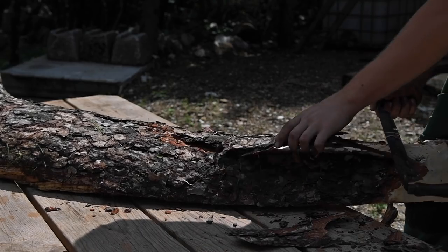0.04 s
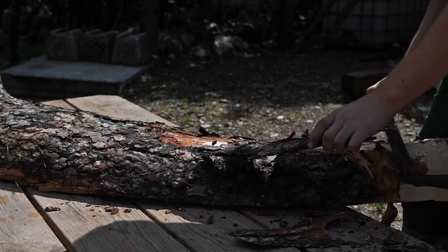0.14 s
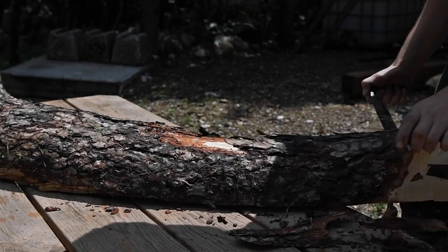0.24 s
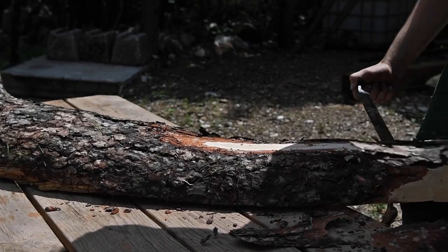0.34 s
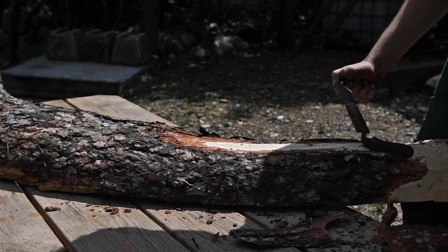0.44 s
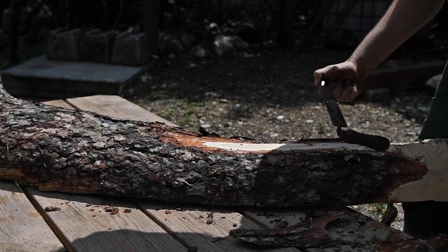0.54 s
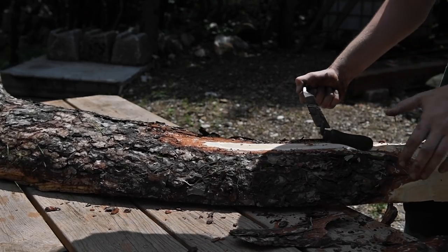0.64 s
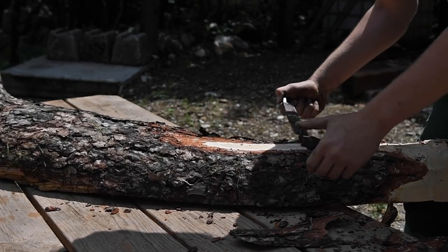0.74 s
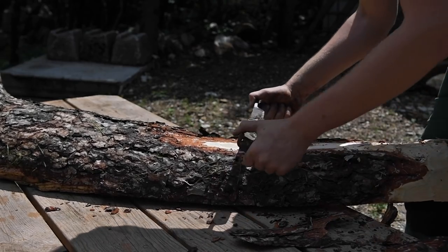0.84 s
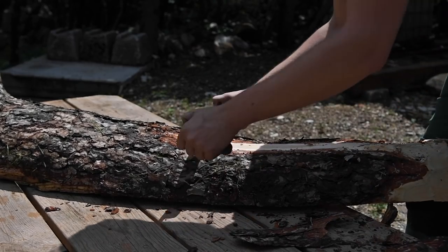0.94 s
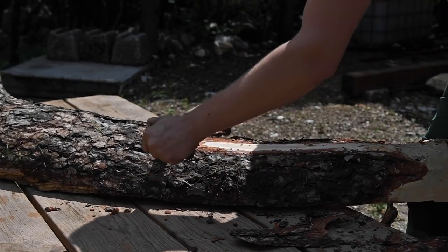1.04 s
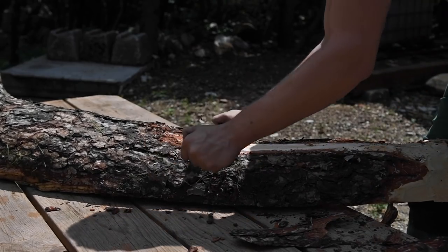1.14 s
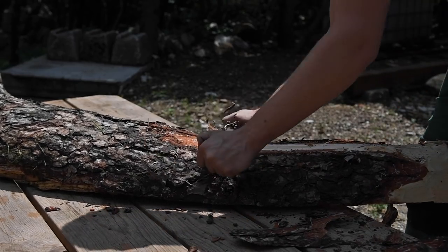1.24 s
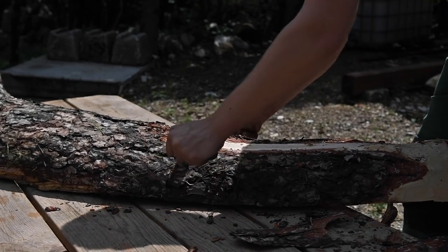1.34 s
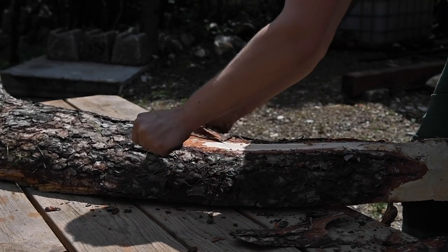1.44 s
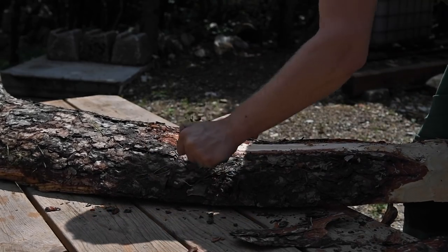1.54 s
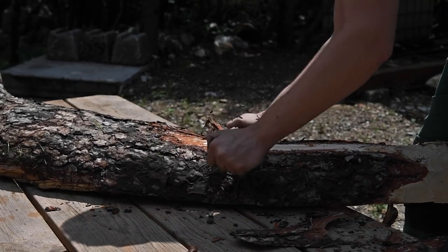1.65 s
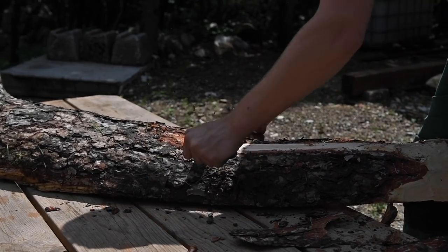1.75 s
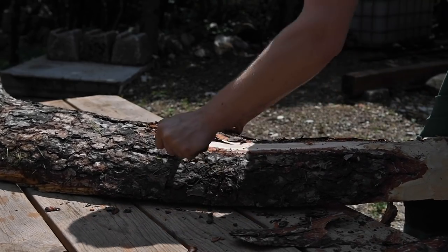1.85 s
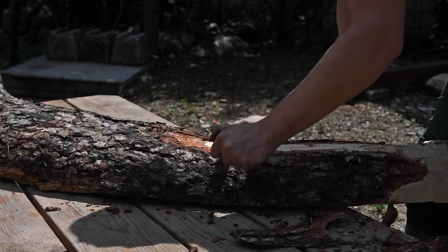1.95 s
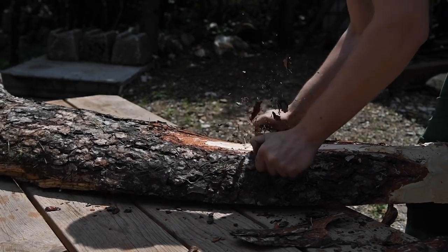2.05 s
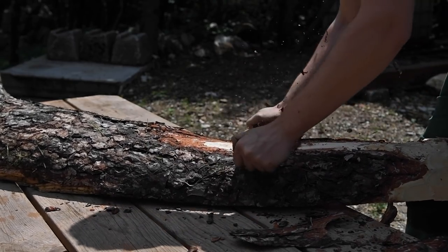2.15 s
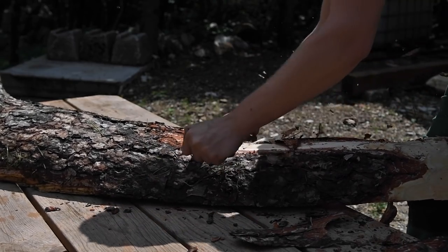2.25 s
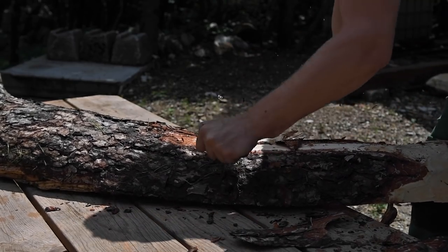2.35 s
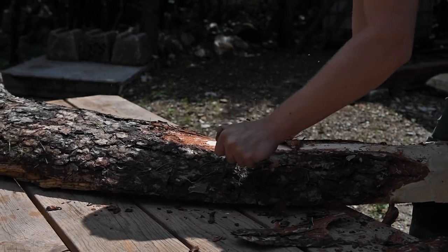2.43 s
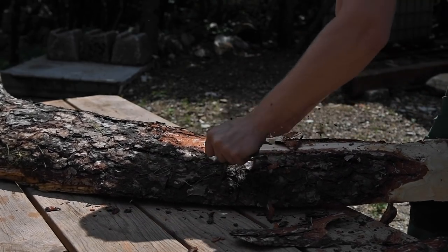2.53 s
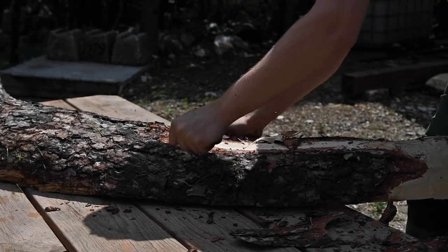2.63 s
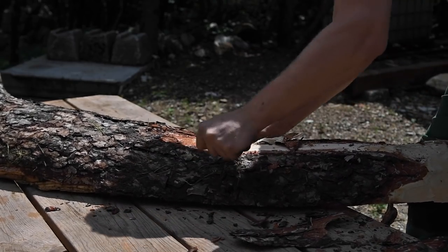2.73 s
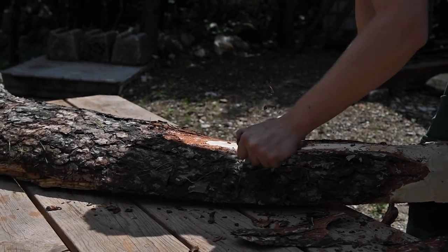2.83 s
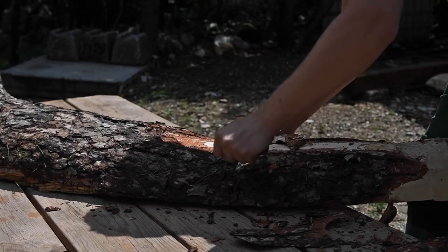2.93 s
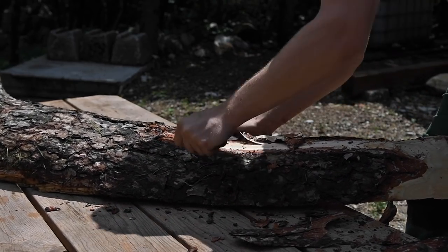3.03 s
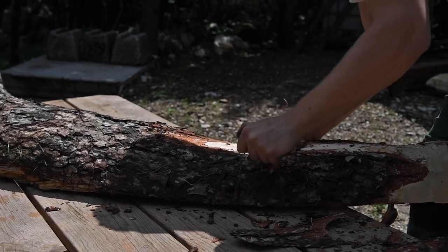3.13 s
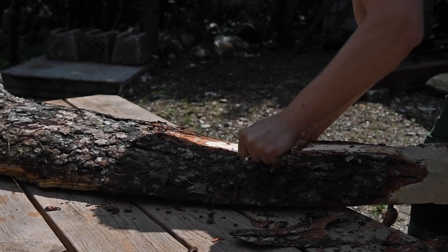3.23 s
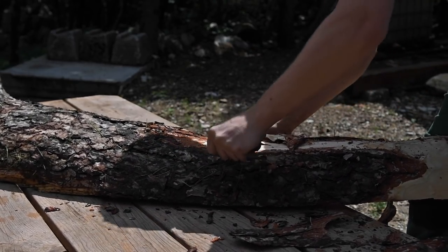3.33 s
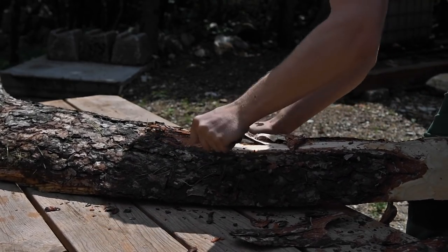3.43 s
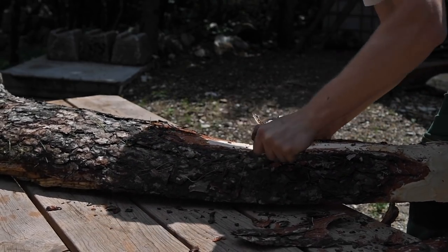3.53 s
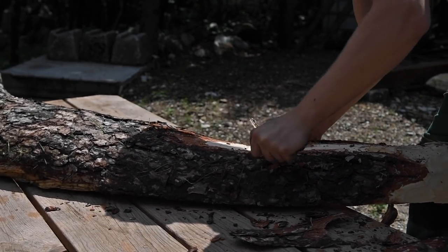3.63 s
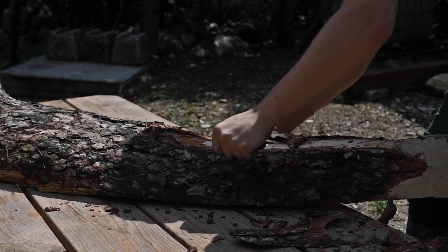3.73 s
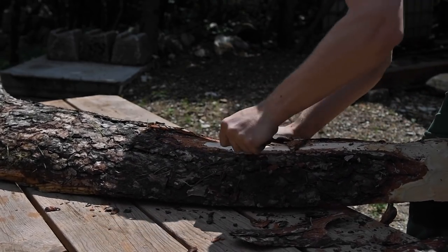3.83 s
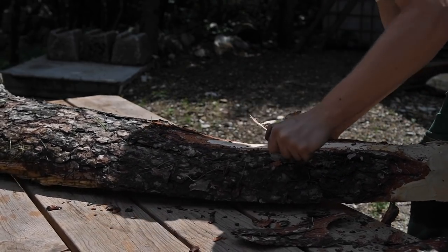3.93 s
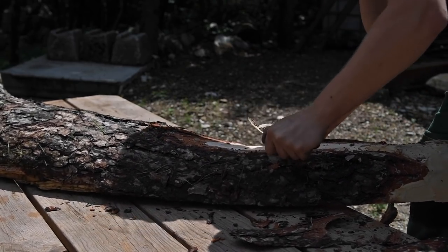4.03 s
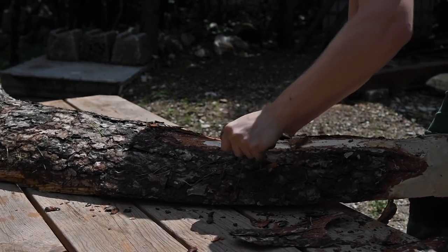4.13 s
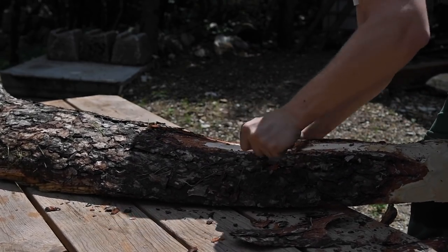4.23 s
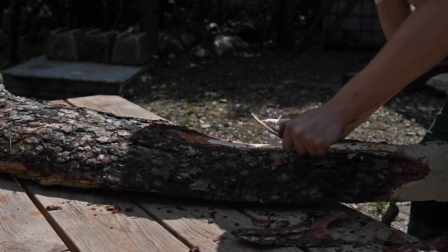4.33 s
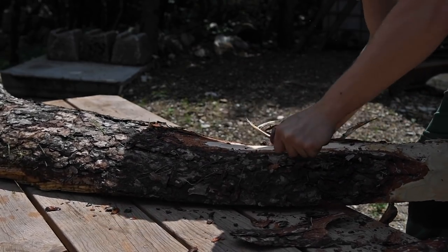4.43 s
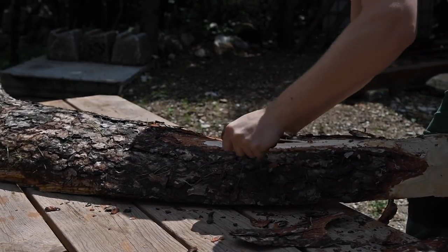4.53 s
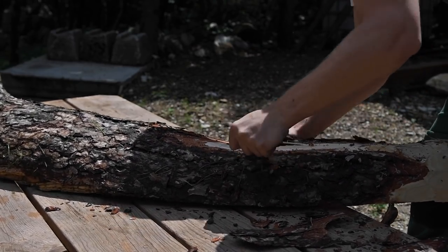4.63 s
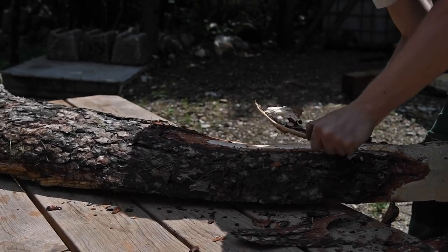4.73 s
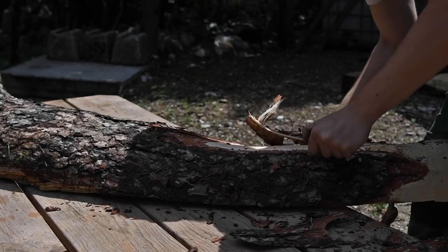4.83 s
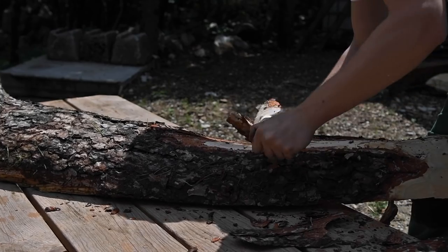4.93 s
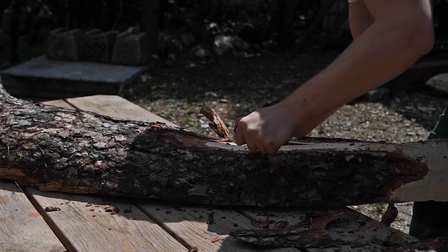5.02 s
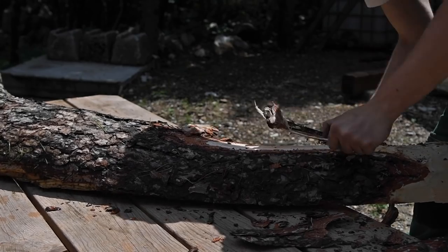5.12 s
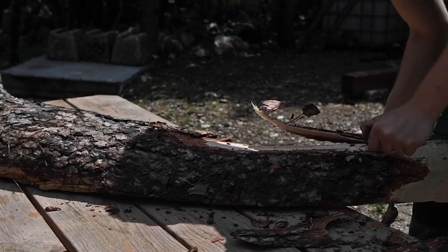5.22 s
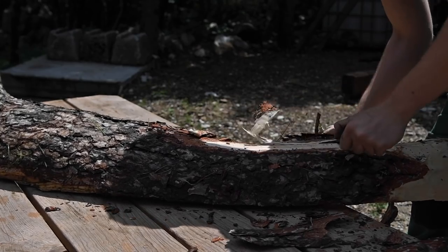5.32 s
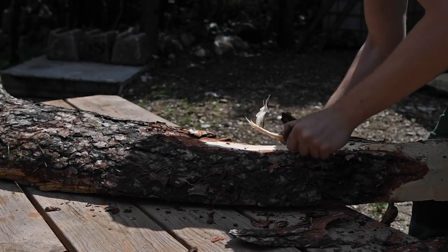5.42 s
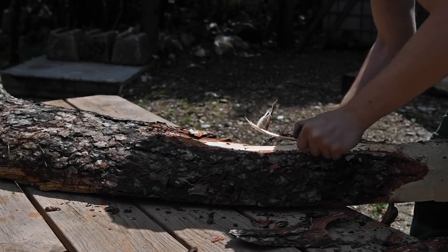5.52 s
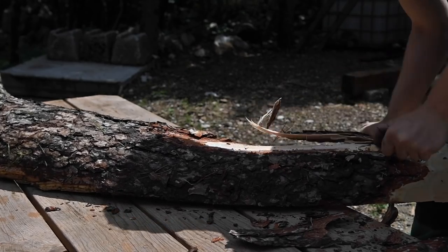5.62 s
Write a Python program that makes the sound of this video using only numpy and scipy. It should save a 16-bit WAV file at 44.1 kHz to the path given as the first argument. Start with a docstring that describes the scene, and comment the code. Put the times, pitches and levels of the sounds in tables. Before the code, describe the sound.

A close stereo microphone hears bark being stripped from a log on a plank deck outdoors. From 0 to 0.8 s there is light brushing, a small snap at 0.1 and a woody knock with scrape near 0.34; a very faint reedy tone sits around 0.55-0.97. At 0.84 a short pull knocks the wood. Rough pulls follow at about 1.2, 1.6, 2.0, 2.45, 2.8, 3.2, 3.55, 3.9, 4.35, 4.75 and 5.2 s, each a brief crackling tear with sharp bright snaps and a hollow, juddering groan from the log. The pull at 3.9 is softer and duller; those at 4.75 and 5.2 bring strong knocks. Light scrapes, rustling crumbs, ticks and soft low settling thuds fill the gaps. A distant songbird gives faint sliding whistles from 1.4, busiest at 2.2-3.3. Soft leaves, far traffic and a barely audible low hum continue throughout; light strokes end it.

```python
"""Rough pulls that crackle and snap: a drawknife strips bark from a fresh log on a plank deck outdoors. Torn
fibres are bursts of coloured noise with short ringing snaps; log and planks ring as resonances. Chips knock on
the planks, and light strokes and loose crumbs rustle in between. A brief reedy tone rings out after an early
knock. Behind it a songbird twitters in sliding whistles, with a low hum and yard noise."""
import sys
import numpy as np
from scipy import signal
from scipy.fft import rfft, irfft, next_fast_len
from scipy.io import wavfile

SR = 44100
rng = np.random.default_rng(int(sys.argv[2]) if len(sys.argv) > 2 else 0)


def store_pcm(level_fs):
    """Save levels as 16-bit WAV."""
    pcm = np.round(np.clip(level_fs, -1, 1) * 32767).astype(np.int16)
    wavfile.write(sys.argv[1], SR, np.atleast_2d(pcm).T)


N = 250047

# Pulls of the blade: (time of full force [s], rise [s], hold [s], fall [s], force [dB],
# thin fibres over thick [dB], centre of the log's groan [Hz], rocking back [dB])
PULLS = [(0.843, 0.011, 0.0032, 0.047, -32, -1, 730, -77), (1.22, 0.048, 0.024, 0.079, -35, 3, 613, -77),
         (1.627, 0.06, 0.027, 0.049, -32, -0.5, 650, -63.5),
         (2.021, 0.044, 0.0077, 0.093, -30.5, 2, 660, -66),
         (2.446, 0.053, 0.013, 0.036, -31, -7.5, 730, -53.5),
         (2.831, 0.021, 0.002, 0.051, -26, -0.3, 594, -51),
         (3.192, 0.019, 0.013, 0.037, -29, -0.5, 690, -52),
         (3.566, 0.028, 0.013, 0.042, -28, -2.9, 716, -54),
         (3.932, 0.015, 0.037, 0.011, -34.5, -1.5, 715, -52),
         (4.351, 0.033, 0.0054, 0.035, -30, -3, 735, -51), (4.753, 0.014, 0.026, 0.045, -28, -1, 820, -57),
         (5.183, 0.033, 0.012, 0.049, -29, 0.1, 820, -69)]
# Light strokes of hand or blade: (time of full level [s], length [s], bark level [dB], wood level [dB])
STROKES = [(0.047, 0.05, -46.5, -55.5), (0.112, 0.022, -67, -56.5), (0.161, 0.033, -56.5, -58),
           (0.338, 0.027, -49.5, -43), (1.08, 0.22, -58, -63), (1.413, 0.038, -79, -61),
           (1.799, 0.068, -56, -53.5), (1.867, 0.092, -56, -54.5), (2.122, 0.016, -52, -40.5),
           (2.311, 0.078, -57.5, -63), (2.632, 0.026, -40, -59), (3.012, 0.074, -75, -51),
           (3.316, 0.047, -49.5, -43), (3.39, 0.071, -60, -48), (3.704, 0.11, -66, -52.5),
           (3.785, 0.043, -49.5, -47), (3.994, 0.033, -45, -48), (4.063, 0.09, -89, -57.5),
           (4.157, 0.09, -78, -58), (4.205, 0.016, -53, -53.5), (4.453, 0.062, -108, -55.5),
           (4.53, 0.052, -59, -54), (4.61, 0.031, -62.5, -49), (4.718, 0.021, -48.5, -41.5),
           (4.977, 0.067, -53.5, -54), (5.129, 0.0071, -31, -42), (5.308, 0.019, -41, -62),
           (5.412, 0.085, -61.5, -59), (5.456, 0.11, -73.5, -54), (5.618, 0.21, -59.5, -58.5)]
# Knocks of blade and chips on wood: (time [s], peak level [dB], centre [Hz], contact [s],
# judder after it [dB])
KNOCKS = [(0.284, -47, 328, 0.0087, -55.5), (0.341, -26.5, 1100, 0.026, -40.5),
          (0.514, -52, 189, .02, -82.5), (0.583, -45, 960, 0.026, -49), (0.832, -22.5, 726, 0.016, -41),
          (0.849, -25, 970, 0.0131, -41.5), (0.926, -53, 573, 0.012, -76), (1.305, -27, 830, 0.019, -43),
          (1.473, -42, 594, 0.016, -58), (1.776, -39.5, 357, .02, -53), (2.021, -23, 670, 0.036, -38.5),
          (2.534, -41, 710, 0.034, -51), (2.627, -30.5, 940, 0.045, -55), (2.817, -22.5, 428, 0.028, -43),
          (3.313, -34.5, 1000, 0.044, -54), (3.564, -16.5, 980, 0.025, -38),
          (3.91, -29.5, 242, 0.064, -47.5), (4.292, -33.5, 240, .05, -47.5),
          (4.704, -31.5, 258, 0.077, -48), (4.745, -17.5, 830, 0.066, -61), (5.128, -14.5, 583, 0.066, -49),
          (5.399, -48, 400, 0.013, -48.5), (5.611, -41.5, 403, 0.027, -55)]
# Resonances of log and planks: (frequency [Hz], width [Hz], level [dB])
WOOD_MODES = [(206.8, 21, 8), (416.4, 76, -1), (554, 30.2, 1.5), (614.5, 80, -3.5), (838, 84, 2),
              (1084, 227, -3.5), (1430, 356, -5)]
GROAN_HZ = (498, 806)  # centres of the low and the high groan


def tearing():
    """Hard tears crackle fibre by fibre; light brushing and trickling crumbs only hiss."""
    # thick fibres: (frequency [Hz], relative level [dB])
    coarse = [(800, -7.5), (1400, 1.5), (3200, 3.5), (5000, -5.5), (7000, -21)]
    # thin fibres: (frequency [Hz], relative level [dB])
    fine = [(3500, -23.5), (5000, -0.5), (7500, 2.5), (10000, -5.5), (16000, -12.5)]
    tear, trickle = swells(tear_rows(), wake_db=-46.5, wake_fall=0.17)
    rustle = amp(rustle_db(np.arange(N) / SR))
    trickle = hush() * np.hypot(trickle, rustle)
    out = 0
    for force, after, spectrum in zip(tear, trickle, (coarse, fine)):
        crackle = coloured(grains(rate=900, spread_db=2.5, life=0.00099), spectrum)
        hiss = coloured(grains(rate=300, spread_db=7.0, life=0.015), spectrum)
        hard = force / (force + amp(-46.0))  # near 1 in a strong tear, near 0 in light brushing
        out = out + force * np.sqrt(hard) * crackle
        out = out + (force * np.sqrt(1 - hard) + after) * hiss
    return out


def tear_rows():
    """What pulls and strokes do to thick and thin fibres."""
    stroke_fine_db = -5  # thin fibres against thick in a light stroke
    pulls = [(*shape, db, db + fine_db) for *shape, db, fine_db, _, _ in PULLS]
    strokes = [(*stroke_shape(s, length), db, db + stroke_fine_db) for s, length, db, _ in STROKES]
    return pulls + strokes


def stroke_shape(s, length):
    """Time, rise, hold and fall of a light stroke, scaled by its length."""
    return s, 0.24 * length, 0.28 * length, 0.89 * length


def rustle_db(s):
    """Level of loose bark and crumbs, which rustle throughout."""
    # (time [s], level [dB])
    rustle = [(0.0, -56.5), (0.39, -73), (0.79, -68), (1.31, -62), (1.72, -65), (2.4, -67.5), (2.51, -59.5),
              (2.81, -51.5), (3.58, -63.5), (3.68, -53.5), (3.79, -64.5), (4.01, -59.5), (4.67, -57),
              (5.16, -70), (5.29, -60), (5.67, -65.5)]
    return np.interp(s, *np.transpose(rustle))


def hush():
    """Gain of rustle and wakes, which dips as the blade is lifted before each pull."""
    lead_s, half_width_s, depth_db = 0.085, 0.054, -11.5  # lead: dip's centre ahead of full force
    t = np.arange(N) / SR
    dips = sum(np.exp(-((t - pull[0] + lead_s) / half_width_s) ** 4) for pull in PULLS)
    return amp(depth_db * dips)


def biting():
    """The blade sticks and slips, which drives the log; the deck shakes on longer."""
    # rumble of the deck: (frequency [Hz], relative level [dB])
    deck = [(25, -86), (60, -31), (120, -1.5), (200, 0), (300, -9), (600, -33)]
    burst, wake = swells(bite_rows(), wake_db=-29.0, wake_fall=0.59)
    *judder, shake = burst
    *log_wake, sway = hush() * wake
    slips = grains(rate=400, spread_db=-0.5, life=0.0058)
    groans = [unit(filtered(slips, lambda f: wood(f) * peak(f, hz, 1.29 * hz) ** 2)) for hz in GROAN_HZ]
    rumble = coloured(grains(rate=200, spread_db=-4.5, life=0.022), deck)
    log = sum((now + after) * groan for now, after, groan in zip(judder, log_wake, groans))
    return log + (shake + amp(8.5) * sway) * rumble


def bite_rows():
    """What pulls, strokes and knocks do to log and deck, as levels of low groan, high groan and deck."""
    log_db, deck_db = -4.5, -15  # log and deck against the force of a pull
    lead_s, extra_hold_s = 0.0082, 0.01  # the wood takes the load earlier and carries it longer
    stroke_deck_db, stroke_hz = -12.5, 710  # deck against log, and groan centre, in light strokes
    judder_rise_s, judder_hold, judder_fall = 0.0027, 0.52, 0.59  # hold and fall in contact times
    thud_db, thud_db_per_octave = 3, -8.5  # deck over judder at the lowest mode; less for higher knocks
    # the low groan outlasts a knock: delay and fall in contact times, level against the judder
    tail_delay, tail_fall, tail_db = 0.62, 2.14, -8.5

    rows = []
    for s, rise, hold, fall, db, _, hz, _ in PULLS:
        rows.append((s - lead_s, rise, hold + extra_hold_s, fall, db + log_db, db + deck_db, hz))
    for s, length, _, db in STROKES:
        rows.append((*stroke_shape(s, length), db, db + stroke_deck_db, stroke_hz))
    for s, _, hz, contact, db in KNOCKS:
        octaves = np.log2(hz / WOOD_MODES[0][0])
        thud = db + thud_db + thud_db_per_octave * octaves
        rows.append((s, judder_rise_s, judder_hold * contact, judder_fall * contact, db, thud, hz))
        tail = db + tail_db
        rows.append((s + tail_delay * contact, contact, judder_hold * contact, tail_fall * contact,
                     tail, tail + thud_db, 0))  # centre 0 puts nearly all in the low groan

    shared = []
    for *shape, db, deck, hz in rows:
        high = np.interp(hz, GROAN_HZ, [.03, .97])  # share of the power in the high groan
        shared.append((*shape, db + 10 * np.log10(1 - high), db + 10 * np.log10(high), deck))
    return shared


def wood(f):
    """The log and planks answer at their own resonances, with alternating signs."""
    return sum((-1) ** k * amp(db) * peak(f, hz, width) for k, (hz, width, db) in enumerate(WOOD_MODES))


def rocking():
    """Let go after a pull, the log settles back on the planks with a soft low thud."""
    delay, *shape = 0.16, 0.031, 0.0092, 0.048  # delay after the pull, rise, hold, fall [s]
    rows = [(pull[0] + delay, *shape, pull[-1]) for pull in PULLS]
    (thud,), _ = swells(rows, wake_db=-30, wake_fall=.2)
    return thud * unit(filtered(rng.standard_normal(N), lambda f: peak(f, 83, 70) ** 2))


def snaps():
    """Fibres fray for a moment, give way in one step, and ring briefly at the size of the chip."""
    # clear snaps and dropping chips: (time [s], peak level [dB], centre [Hz])
    clear_snaps = [(0.101, -21.5, 7900), (0.2843, -31.5, 7460), (0.3337, -34, 3100), (0.3914, -36.5, 6860),
                   (0.484, -36, 13100), (0.5971, -32, 2560), (0.6302, -35, 3840), (0.8348, -32, 3540),
                   (0.8488, -11.5, 4240), (1.1806, -18.5, 5370), (1.229, -13, 6000), (1.2571, -22, 7100),
                   (1.2706, -14, 6800), (1.287, -1, 6800), (1.4258, -32, 5460), (1.4778, -38.5, 2330),
                   (1.6101, -10, 6460), (1.6408, -14, 4100), (1.8195, -30, 5560), (1.8774, -31.5, 4930),
                   (2.015, -9.5, 5040), (2.025, -4, 5300), (2.0275, -4, 5200), (2.052, -13.5, 6900),
                   (2.2834, -35.5, 6560), (2.3402, -35.5, 5630), (2.396, -34, 3100), (2.4412, -13, 7350),
                   (2.4544, -8, 3220), (2.4691, -19, 3600), (2.5392, -32, 3770), (2.6298, -19.5, 5650),
                   (2.648, -19, 2530), (2.8304, -3.5, 5200), (2.834, -3, 4170), (2.8494, -22, 6000),
                   (2.8798, -15.5, 2880), (3.1833, -12.5, 5300), (3.1993, -10.5, 4220),
                   (3.2028, -6.5, 3300), (3.3454, -41, 4360), (3.5678, -2.5, 3750), (3.5903, -11, 5000),
                   (3.706, -35, 1970), (3.758, -34, 3340), (3.911, -36, 2500), (3.9877, -17, 3230),
                   (4.0, -14, 3700), (4.292, -38, 2500), (4.3325, -16, 3820), (4.3546, -3.5, 5700),
                   (4.5222, -39, 8400), (4.636, -37, 7100), (4.704, -43, 2470), (4.748, -8.5, 6150),
                   (4.7522, -7.5, 4600), (4.7698, -7, 4770), (4.7774, -15, 6000), (4.7883, -6, 5000),
                   (4.8024, -13.5, 7740), (4.8743, -29.5, 6400), (5.1657, -20, 4740), (5.1812, -8, 2800),
                   (5.1849, -23, 5170), (5.3098, -18, 4600), (5.3341, -22.5, 7300), (5.3471, -35, 7300),
                   (5.371, -30.5, 7000), (5.3797, -40, 7350), (5.3995, -33, 2680)]
    lead = 128  # samples of fraying before the step
    out = np.zeros(N + SR)
    t, f = (np.arange(1024) - lead) / SR, np.fft.rfftfreq(2048, 1 / SR)
    rows = clear_snaps + crumbs()
    swell = amp(np.where(t < 0, 60 * t / 0.0019, -60 * t / 0.01))
    fray = rng.standard_normal((len(rows), len(t))) * swell
    for (s, db, hz), noise in zip(rows, fray):
        push = 0.13 * noise + (t == 0)
        colour = peak(f, hz, 1.16 * hz) ** 2 + 0.064 * peak(f, 3800, 4800)
        burst = irfft(rfft(push, 2048) * colour)[:len(t)]
        out[round(s * SR):][:len(t)] += amp(db) * burst / np.abs(burst).max()
    return out[lead:N + lead]


def crumbs():
    """Falling crumbs tick faintly at chance times, in rows like those of the clear snaps."""
    count, least_db, spread_db, middle_hz = 30, 10, 1, 5200  # least peak level is over the rustle
    when, size, pitch = rng.random((count, 3)).T
    s = when * N / SR
    db = rustle_db(s) + least_db - spread_db * np.log(1 - size)
    return list(zip(s, db, middle_hz * (.6 + .8 * pitch)))


def knocks():
    """Each blow favours the wood's resonances near its own centre."""
    out, size = np.zeros(N + SR), 8192
    f, t = np.fft.rfftfreq(size, 1 / SR), np.arange(size) / SR
    rough = rng.standard_normal((len(KNOCKS), size))
    for (s, db, hz, contact, _), noise in zip(KNOCKS, rough):
        push = 0.2 * noise * amp(-60 * t / contact) + (t == 0)
        ring = irfft(rfft(push) * wood(f) * peak(f, hz, 0.73 * hz) ** 2)[:size // 2]
        out[round(s * SR):][:size // 2] += amp(db) * ring / np.abs(ring).max()
    return out[:N]


def bird():
    """Whistles slide fast, then settle, with a fluttering level; mostly heard through the trees' echoes."""
    # (time [s], length [s], start [Hz], end [Hz], level before flutter and echoes [dB])
    notes = [(1.408, 0.025, 2800, 3110, -63), (1.512, 0.015, 4000, 3700, -55),
             (1.763, 0.013, 4000, 3670, -56), (1.781, 0.019, 2800, 3080, -56.5),
             (2.173, 0.0587, 3050, 2560, -56.5), (2.22, 0.08, 2650, 1661, -63),
             (2.283, 0.044, 7930, 7500, -54), (2.334, 0.05, 7500, 7100, -65),
             (2.38, 0.047, 5400, 5170, -51), (2.535, 0.021, 8600, 8100, -59),
             (2.575, 0.068, 6470, 5450, -52.5), (2.585, 0.03, 7650, 7900, -60),
             (2.638, 0.056, 7660, 7600, -51), (2.71, 0.062, 9200, 7840, -53),
             (2.723, 0.063, 7300, 7000, -59), (2.765, 0.04, 8250, 7860, -60),
             (2.781, 0.063, 5940, 6260, -51), (2.867, 0.029, 8600, 9130, -49),
             (2.922, 0.033, 9100, 8600, -57), (2.979, 0.023, 6700, 7230, -62),
             (2.994, 0.026, 6540, 6550, -48.5), (3.03, 0.07, 6600, 6480, -60),
             (3.035, 0.021, 8000, 8830, -51), (3.098, 0.049, 6000, 6830, -53),
             (3.142, 0.013, 6450, 8000, -49), (3.264, 0.05, 7640, 6420, -55),
             (3.313, 0.05, 6700, 6400, -67)]
    out = np.zeros(N)
    for s, length, start_hz, end_hz, db in notes:
        u = np.linspace(0, 1, int(length * SR))
        hz = end_hz + (start_hz - end_hz) * (1 - u) ** 1.4
        whistle = np.sin(2 * np.pi * np.cumsum(hz) / SR)
        out[round(s * SR):][:len(u)] += amp(db) * np.sin(np.pi * u) ** 0.32 * whistle
    flutter = unit(filtered(rng.standard_normal(N), lambda f: peak(f, 150, 250)))
    out = out * (.6 + .8 * flutter)
    direct = out * amp([[1.5], [-1.5]])  # a little to the left
    return direct + amp(1.5) * echoes(out, t60=0.5, dull_hz=15100)


def reed():
    """A faint reedy tone: four narrow bands of one noise, held briefly."""
    # (frequency [Hz], level before the swell [dB])
    partials = [(673, -64), (1249, -72), (1825, -76), (2428, -74)]
    start_s, end_s = 0.55, 0.97
    u = np.clip((np.arange(N) / SR - start_s) / (end_s - start_s), 0, 1)
    noise = rng.standard_normal(N)
    tone = sum(amp(db) * unit(filtered(noise, lambda f: peak(f, hz, 34))) for hz, db in partials)
    return np.sin(np.pi * u) ** 0.27 * tone


def hum():
    """A faint, fuzzy low hum from afar: noise through a narrow resonance."""
    return amp(-82.5) * unit(filtered(rng.standard_normal(N), lambda f: peak(f, 77, 9.4) ** 2))


def yard():
    """Far leaves and traffic: steady noise, alike left and right in the middle range, not in the treble."""
    # (frequency [Hz], relative level [dB])
    spectrum = [(25, -27), (60, -3), (110, -3.5), (200, -1.5), (900, -5.5), (1500, -12.5), (2500, -14),
                (7000, -20), (16000, -26)]
    # (frequency [Hz], left-right likeness [0 to 1])
    alike = [(60, 0.31), (640, 0.8), (3000, 0.56), (15000, 0.04)]

    def split(f):
        """Shares of middle and side that give the wanted likeness."""
        turn = np.arccos(np.clip(along(alike, f), -1, 1)) / 2
        return amp(along(spectrum, f)) * [np.cos(turn), np.sin(turn)]

    mid, side = filtered(rng.standard_normal((2, N)), split)
    return amp(-63.5) * unit(np.array([mid + side, mid - side]))


def swells(rows, wake_db, wake_fall):
    """Gains of events that rise 20 dB, hold and fall 20 dB in their times, each with a weaker wake."""
    step = 1 / 1000  # s
    t, burst, wake = np.arange(0, N / SR, step), 1e-20, 1e-20
    for s, rise, hold, fall, *db in rows:
        db = np.reshape(db, (-1, 1))
        before = np.maximum((s - t) / max(rise, step), 0) ** 1.19
        after = np.maximum(t - s - hold, 0)
        burst = burst + amp(db - 20 * (before + after / max(fall, step))) ** 2
        wake = wake + amp(db + wake_db - 20 * (before + after / wake_fall)) ** 2
    samples = np.arange(N) / SR
    return [np.array([np.interp(samples, t, np.sqrt(power)) for power in part]) for part in (burst, wake)]


def grains(rate, spread_db, life):
    """Noise in short random bursts of uneven size, rms 1; rate per second, life in seconds."""
    size = amp(spread_db * np.minimum(rng.exponential(size=N), 3))
    starts = (rng.random(N) < rate / SR) * size
    t = np.arange(SR // 50) / SR
    return unit(signal.fftconvolve(starts, np.exp(-t / life))[:N] * rng.standard_normal(N))


def echoes(x, t60, dull_hz):
    """Many scattered reflections, different in each channel, that fall 60 dB in t60 seconds."""
    t = np.arange(SR // 2) / SR
    tail = rng.standard_normal((2, len(t))) * amp(-60 * t / t60)
    wet = signal.fftconvolve(x[None], tail / np.linalg.norm(tail[0]), axes=1)[:, :N]
    return filtered(wet, lambda f: 1 / (1 + 1j * f / dull_hz))


def coloured(x, spectrum):
    """x shaped by the given spectrum, rms 1."""
    return unit(filtered(x, lambda f: amp(along(spectrum, f))))


def peak(f, hz, width):
    """One resonance, which rings only after it is struck."""
    return 1j * f * width / (hz * hz - f * f + 1j * f * width)


def filtered(x, response):
    """x with each frequency scaled and shifted by a complex response."""
    m = next_fast_len(N + SR // 2)
    return irfft(rfft(x, m) * response(np.fft.rfftfreq(m, 1 / SR)), m)[..., :N]


def along(points, hz):
    """Values read between (frequency [Hz], value) points on a log axis."""
    f, v = np.transpose(points)
    return np.interp(np.log(hz + 1), np.log(f + 1), v)


def amp(db):
    """Decibels as a plain factor."""
    return 10 ** (np.asarray(db) / 20)


def unit(x):
    """x scaled to rms 1."""
    return x / np.sqrt(np.mean(x ** 2) + 1e-20)


def scene():
    """The work moves a little along the log; deck and ground scatter its treble differently to each side."""
    # where the work is heard: (time [s], left over right [dB])
    place = [(0.0, -2.2), (0.79, 8), (0.83, -7.5), (1.1, -0.3), (5.67, -0.6)]
    # how far the left channel leads: (frequency [Hz], phase [rad])
    port_lag = [(100, 0.02), (4000, 0.2), (8000, 0.65), (14000, 1)]
    work = tearing() + biting() + rocking() + snaps() + knocks()
    pan_db = np.interp(np.arange(N) / SR, *np.transpose(place))
    halves = [.5, -.5]  # left and right each take half the difference
    ports = filtered(work, lambda f: np.exp(1j * np.outer(halves, along(port_lag, f))))
    ports = ports * amp(np.outer(halves, pan_db))
    scatter = echoes(work, t60=0.024, dull_hz=14100)
    scatter = amp(-12) * filtered(scatter, lambda f: 1j * f / (4000 + 1j * f))
    return ports + scatter + bird() + reed() + hum() + yard()


def record(dry):
    """The microphone drops the deepest bass and keeps nothing from its band limit upwards."""
    top_hz = 15900
    return filtered(dry, lambda f: (1j * f / (45 + 1j * f)) ** 3 * (f < top_hz))


dry = scene()
out = record(dry)
store_pcm(out)
```